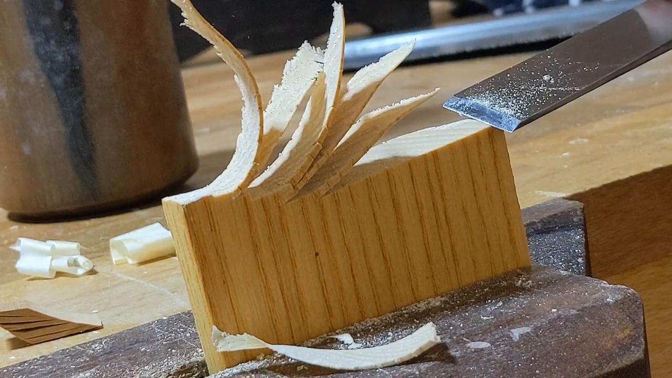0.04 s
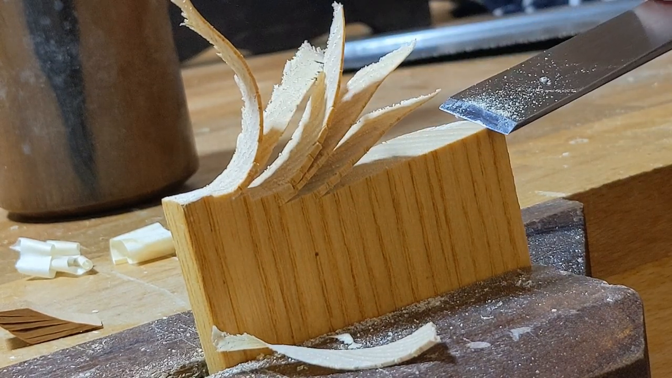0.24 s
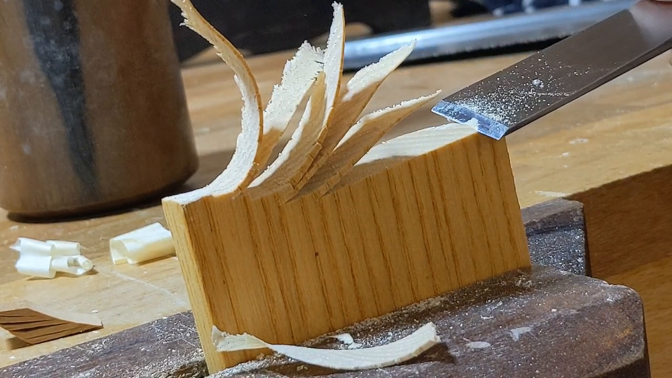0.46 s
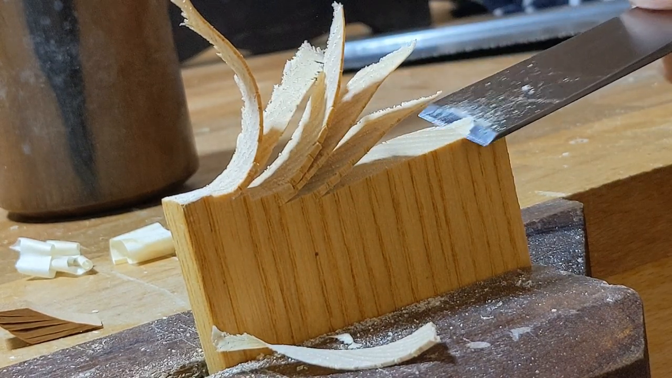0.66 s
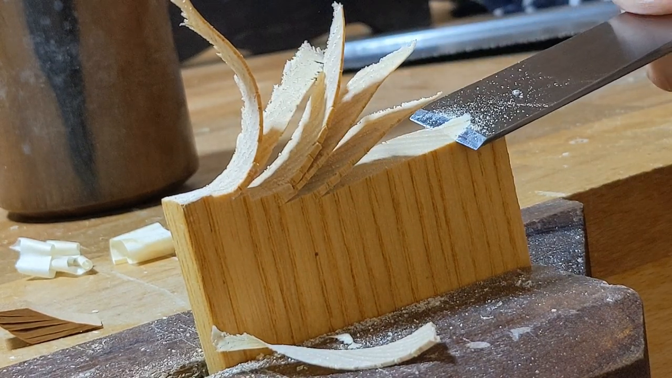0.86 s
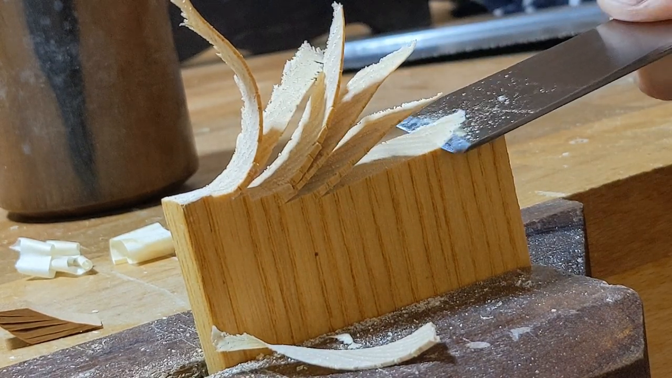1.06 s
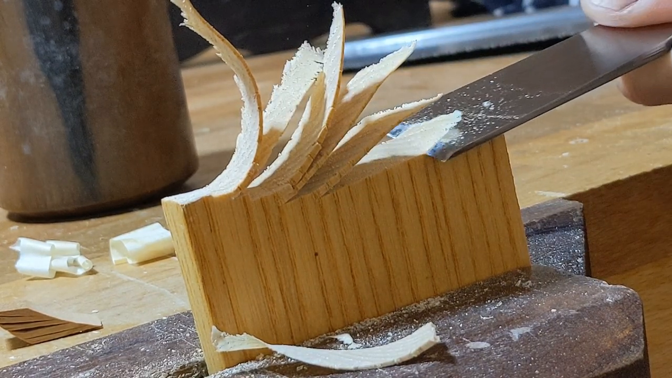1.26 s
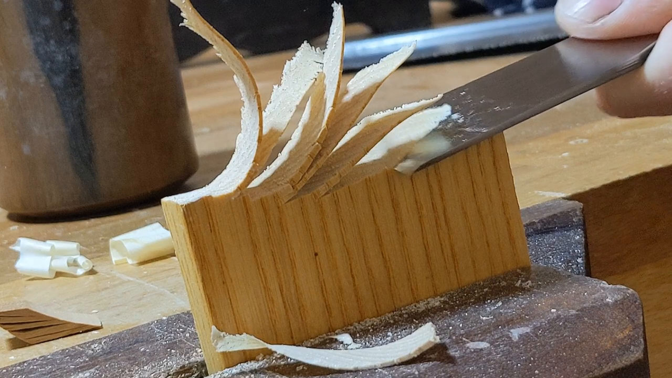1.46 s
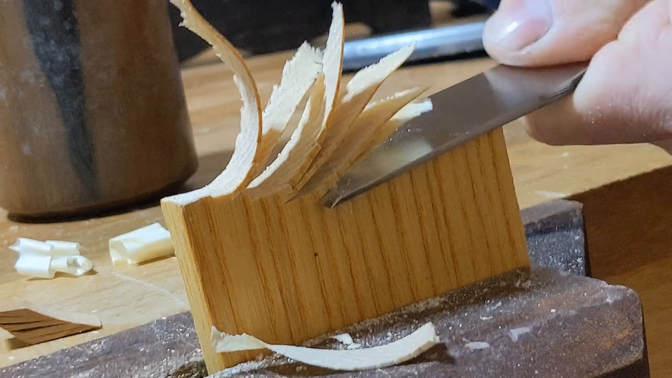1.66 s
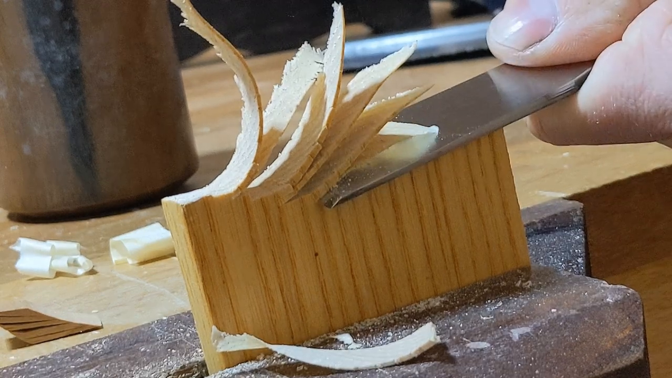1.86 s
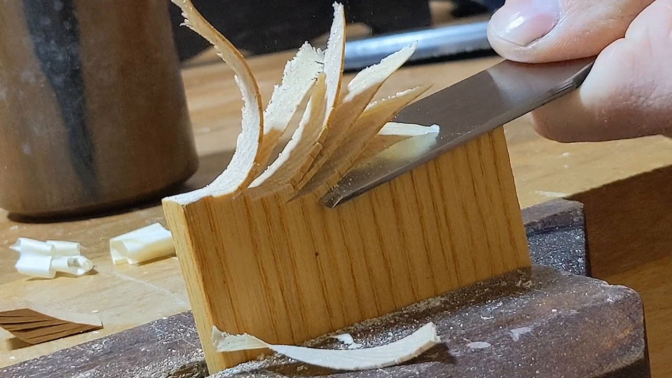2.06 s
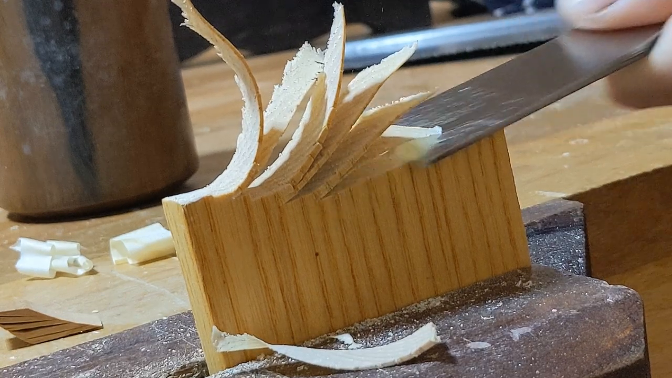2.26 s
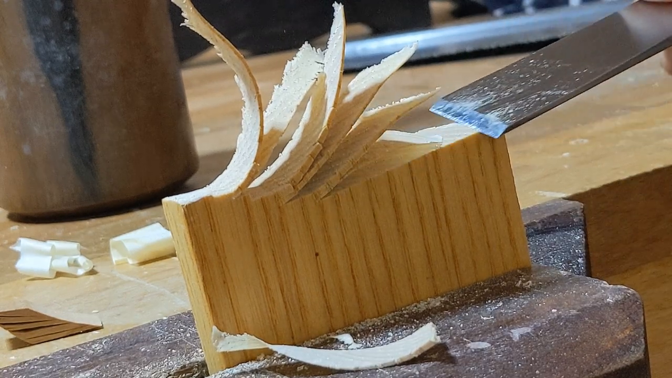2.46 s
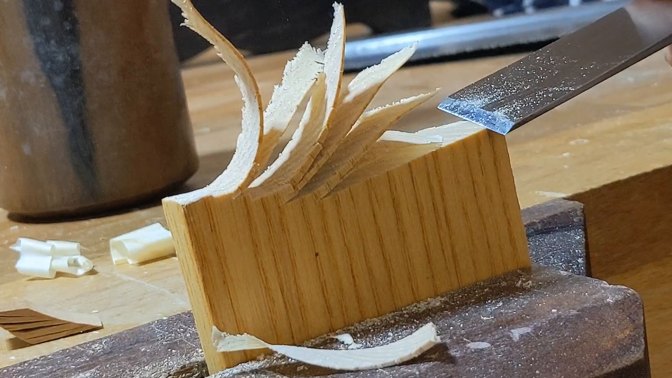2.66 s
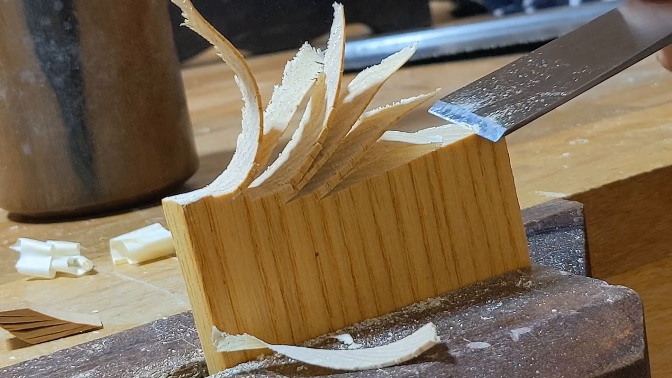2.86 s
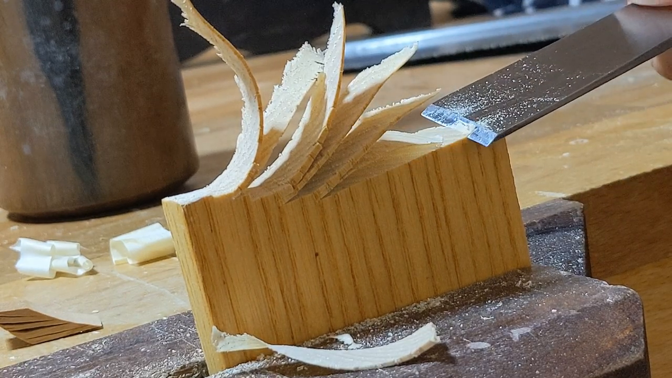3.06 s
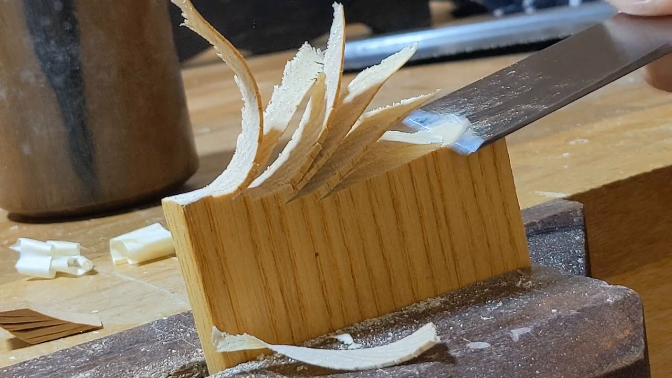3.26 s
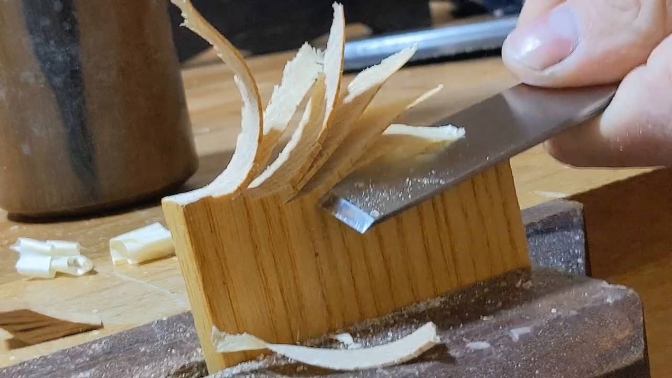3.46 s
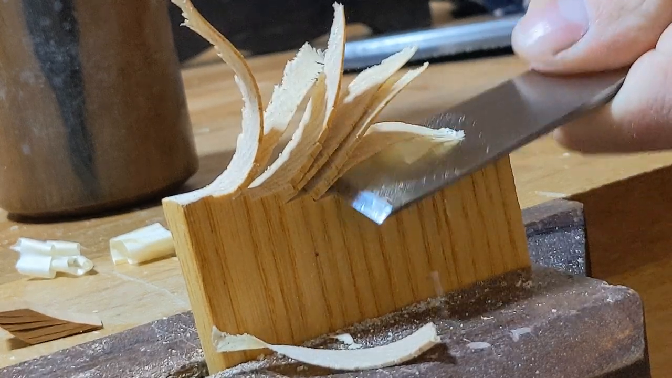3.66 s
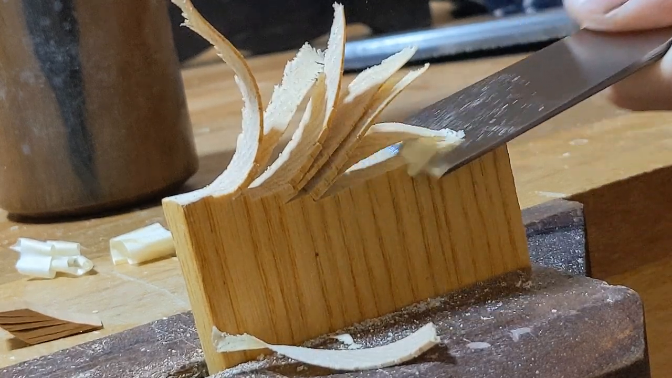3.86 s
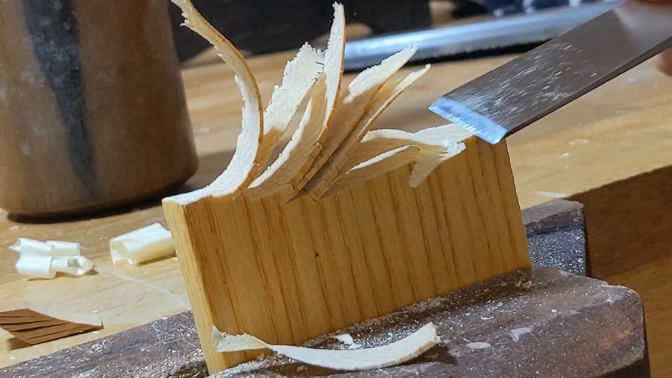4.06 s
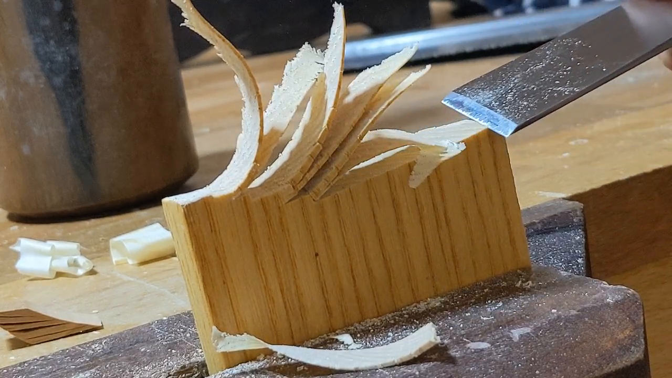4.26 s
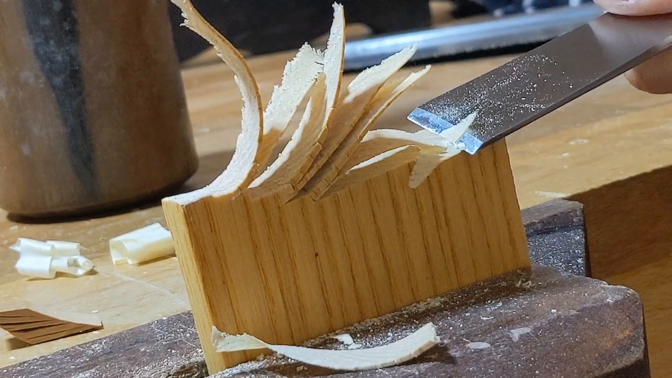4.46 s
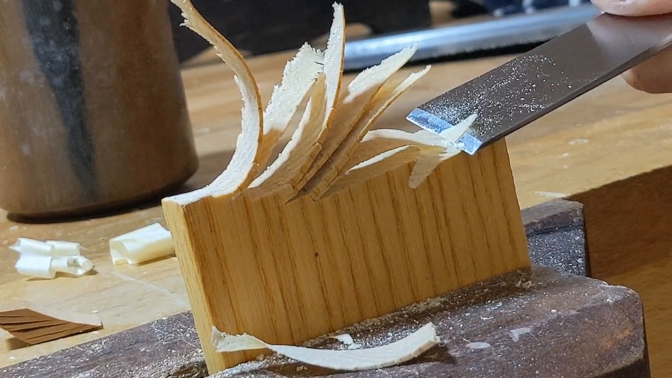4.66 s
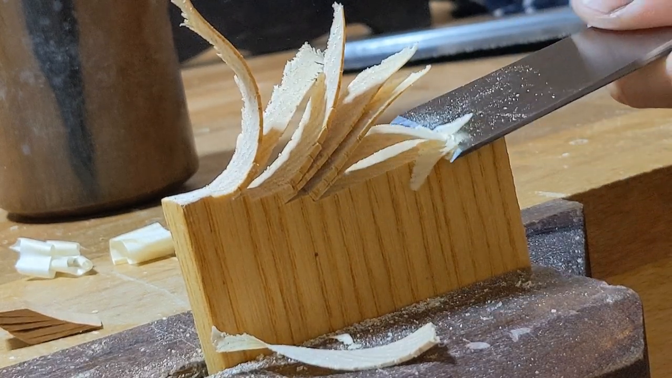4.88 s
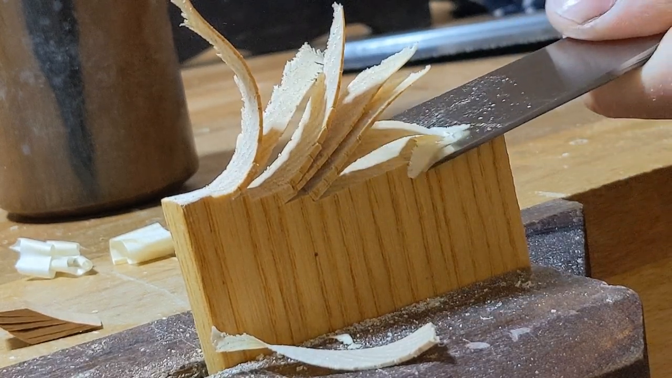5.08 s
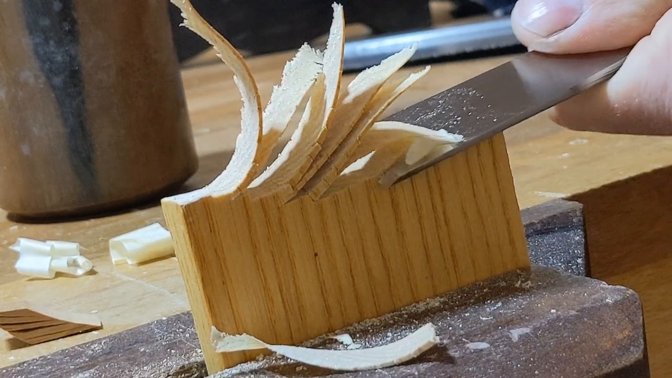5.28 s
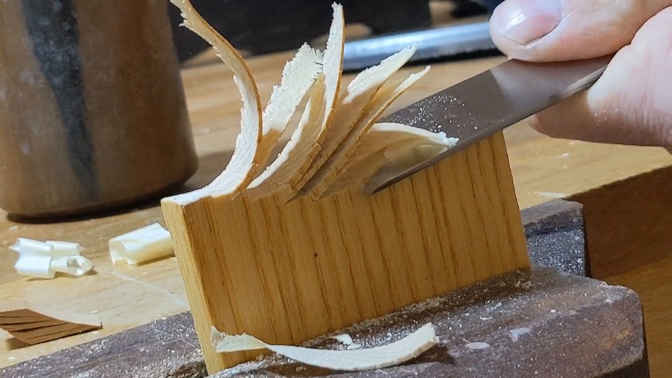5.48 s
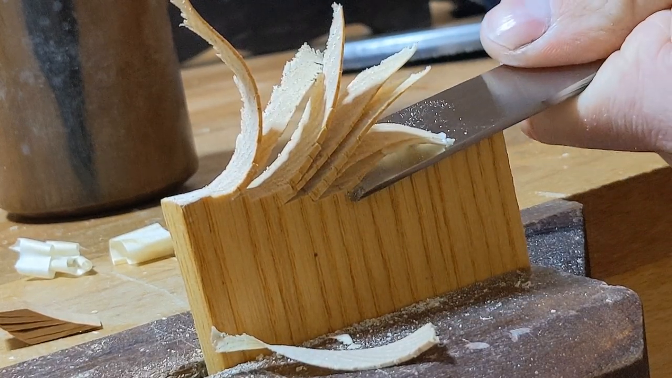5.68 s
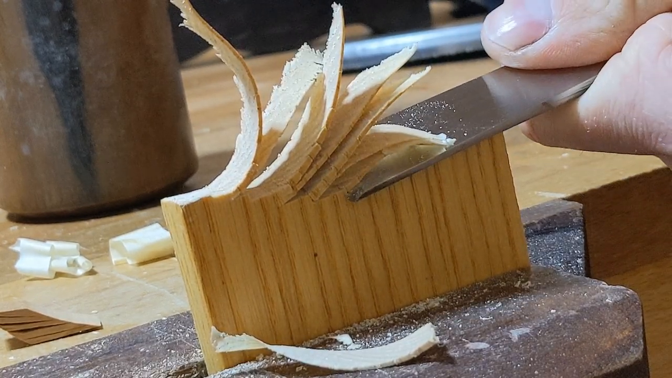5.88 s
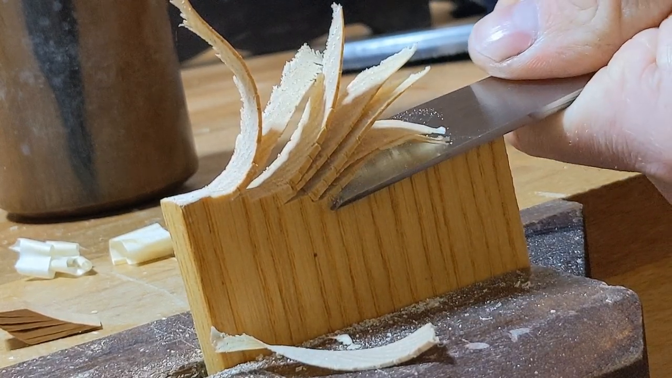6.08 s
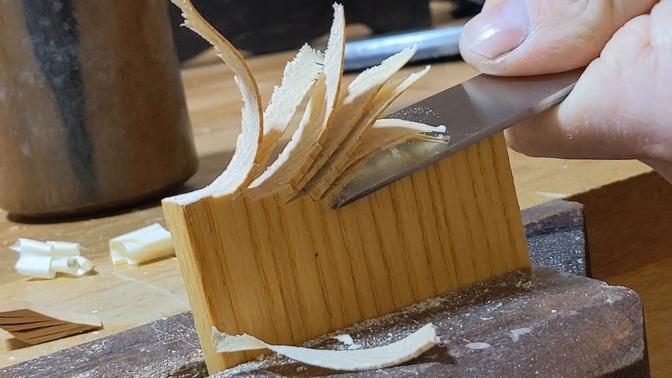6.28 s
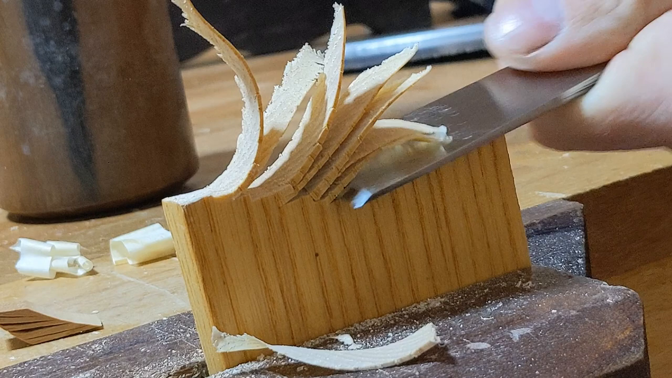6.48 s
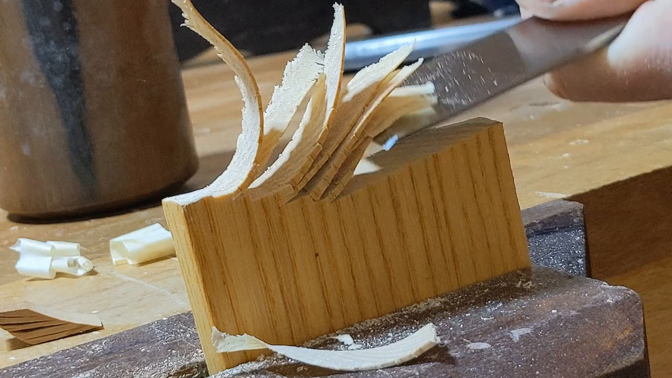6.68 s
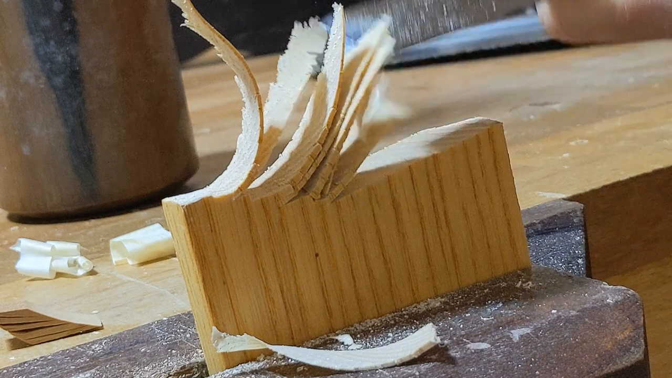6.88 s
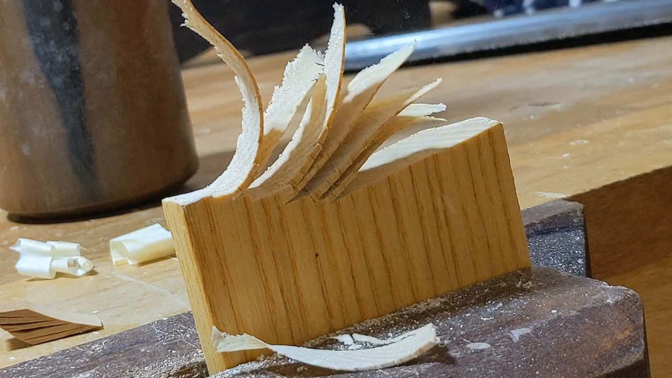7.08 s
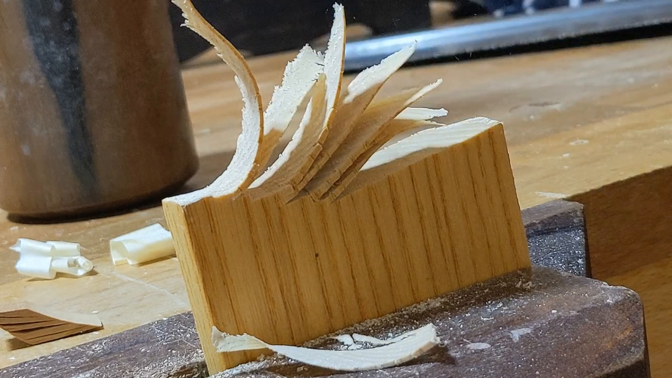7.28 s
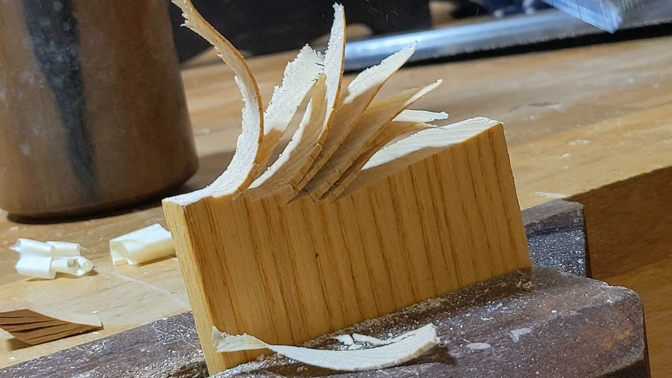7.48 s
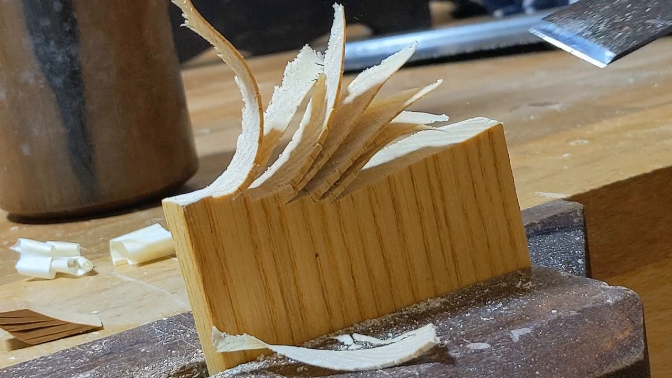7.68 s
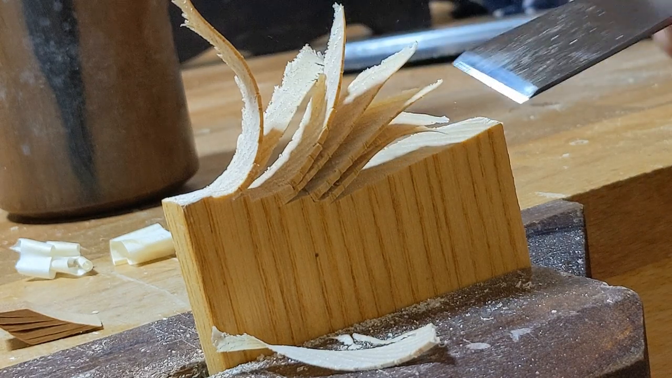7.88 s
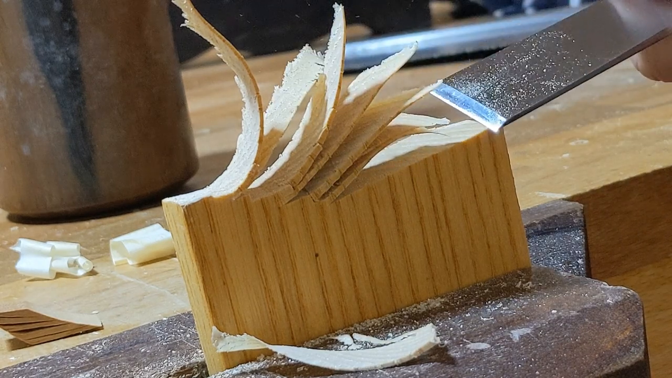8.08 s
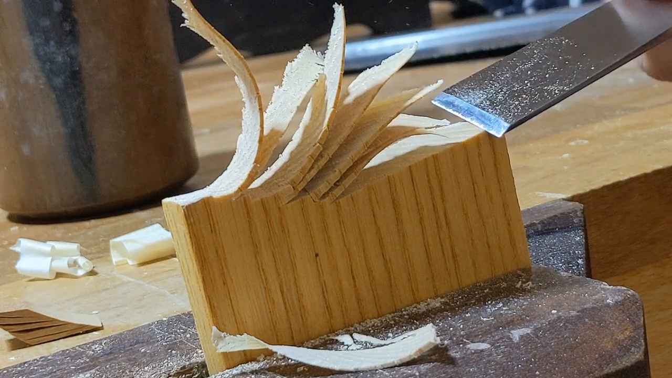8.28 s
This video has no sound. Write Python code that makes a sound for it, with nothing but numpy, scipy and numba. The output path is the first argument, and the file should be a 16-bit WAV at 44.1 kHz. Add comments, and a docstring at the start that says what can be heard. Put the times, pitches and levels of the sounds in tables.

```python
"""A small workshop: a hand-pushed chisel pares thin shavings from a wooden block clamped on a bench.
Dense random clicks make the tearing of fibres, moving noise resonances the rustle of blade and shavings;
block and bench rumble in low bands; snaps, knocks, bumps, a squeak and a skipping edge ring wood and blade.
A faint mains hum and room hiss lie under it, and short tails of random echoes give the room.
A close pair of microphone ports hears the work brighter on the right."""
import sys
import numpy as np
from scipy import signal
from scipy.fft import rfft, irfft, next_fast_len
from scipy.io import wavfile
from scipy.ndimage import uniform_filter1d
from numba import njit

SR = 44100
rng = np.random.default_rng(int(sys.argv[2]) if len(sys.argv) > 2 else 0)


def makeup_ratio(level_db):
    """Linear amplitude ratio for a level in decibels (20 dB per factor of ten)."""
    decades = np.asarray(level_db, float) / 20
    return 10 ** decades


def dump_mix(stems):
    """Bounce the given channels to the path in sys.argv[1] as a 16-bit WAV at rate SR."""
    frames = np.atleast_2d(stems).T  # one column per channel
    limited = np.clip(frames, -1, 1)  # hard clip at full scale
    pcm = np.round(limited * 32767).astype(np.int16)
    wavfile.write(sys.argv[1], SR, pcm)


N = 367787  # samples
TICKS = np.arange(0, N / SR + .01, .0005)  # times of the level curves, s
HZ = np.fft.rfftfreq(16384, 1 / SR)

# room hiss: f/Hz, relative power density/dB; then its rms level/dB
HISS = [(15, -57), (25, -19), (70, -11.5), (102, -21.5), (130, -19), (363, -22.5), (463, -21), (2550, -31),
        (3720, -29.5), (14400, -45.5), (15700, -54), (16000, -96)]
HISS_DB = -65.5
# likeness of the hiss at the two ports: f/Hz, left-right coherence
HISS_SAME = [(60, 0.18), (240, 0.38), (950, 0.043), (3770, -0.11), (15000, -0.041)]
HUM_HZ, HUM_DB = 100, -72.5

# modes of block and blade, shared by all contacts: f/Hz, width/Hz, height/dB before each sound's share
BODY = [(217.5, 10, 7), (410, 25, 9), (456, 30, 9), (570, 60, 5), (700, 30, 6), (1345, 60, 8),
        (2100, 300, 7), (4130, 450, 9), (5960, 370, 2)]
MODES_DB = sum(db / (1 + (2 * (HZ - hz) / width) ** 2) for hz, width, db in BODY)
MODE_WANDER = .015  # share by which the modes slide as the cut deepens and the grip shifts
MODE_SHARE, MODE_DAMPING = .8, .45  # the grip damps now one mode, now another

# dull bumps as the blade is levered and set down: t/s, length/s, level/dB, centre f/Hz
BUMPS = [(0.012, 0.031, -65, 194), (1.761, 0.015, -46, 116), (1.829, 0.071, -59.5, 158),
         (1.922, 0.018, -56, 83), (2.165, 0.012, -56, 234), (2.255, 0.018, -55.5, 124),
         (2.359, 0.076, -63, 685), (3.463, 0.032, -33, 307), (3.462, 0.033, -50, 89),
         (3.504, 0.015, -34, 94), (3.551, 0.013, -31.5, 565), (3.577, 0.035, -42, 94),
         (3.603, 0.014, -33, 450), (3.607, 0.0055, -37.5, 915), (3.644, 0.024, -43.5, 192),
         (3.698, 0.016, -40.5, 573), (4.572, 0.025, -45, 396), (6.199, 0.022, -41.5, 424),
         (5.984, 0.06, -50, 400), (6.323, 0.022, -56.5, 366), (6.473, 0.022, -46.5, 383),
         (6.469, 0.014, -52, 185), (6.522, 0.013, -53, 246), (6.558, 0.0071, -47.5, 190),
         (8.16, 0.026, -73, 295)]
BUMP_OCTAVES = 0.58
BUMP_BITE_DB_PER_S, BUMP_FALL_DB_PER_S = 5999, 462

# the blade knocks the block: t/s, crack peak level/dB, centre f/Hz, ring over crack/dB, crack width/octaves
TAPS = [(0.013, -34.5, 2330, 1.5, 0.37), (2.357, -42.5, 1660, 1.5, 0.27), (2.563, -51, 1690, 5.5, 0.27),
        (3.4644, -13.5, 2240, -3.5, 0.57), (3.688, -11, 2400, -10.5, 0.4), (8.1693, -28, 2930, 1, 0.23)]
# modes of the lifted blade and the free block: f/Hz, level/dB before scatter and pitch weighting, t60/s
LIFTED = [(343, 14, 0.08), (690, 14, 0.18), (1370, 3, 0.09), (1560, 8, 0.06), (1800, 10, 0.025),
          (2900, 6, 0.035), (3150, 9, 0.025), (4690, 5, .02), (5670, 13, 0.01), (6930, 10, 0.01)]
RING_FUZZ = 1.2  # radians of wobble: the hand-held blade does not ring cleanly
HIGH_CRACK_DB, HIGH_CRACK_OCTAVES = -9, 0.2  # every knock has a second, higher, narrow crack

# pushes of the edge and, near 7 s, brushes against shavings: t/s, length/s, tearing level/dB at the end,
# swell/dB on the way, block level/dB, bench level/dB at the end
CUTS = [(0.285, 0.24, -64, 5.5, -63.5, -87), (0.561, 0.14, -56.5, 9.5, -56.5, -68),
        (0.775, 0.043, -43.5, 10, -50, -55), (1.012, 0.039, -55, 11, -57, -73),
        (1.135, 0.05, -43.5, 9.5, -47, -60.5), (1.253, 0.27, -44.5, 11.5, -44.5, -58),
        (1.46, 0.13, -47.5, -6, -47, -58.5), (1.569, 0.13, -37.5, 7.5, -41, -60),
        (1.627, 0.075, -26, 14.5, -32, -44), (1.708, 0.0083, -49, -11, -51, -41.5),
        (1.746, 0.15, -70, -7, -65.5, -71), (2.856, 0.047, -58.5, 8, -61, -91),
        (2.966, 0.047, -50.5, 10, -56, -59.5), (3.138, 0.14, -49.5, 14.5, -52, -63),
        (3.383, 0.035, -36.5, 12, -37.5, -53), (3.451, 0.1, -74, -20, -64, -58),
        (3.673, 0.032, -64.5, -35.5, -52.5, -68), (4.335, 0.23, -46, 26.5, -69, -56),
        (4.795, 0.044, -55, 6.5, -58, -90), (4.844, 0.03, -56.5, -1, -58.5, -88),
        (4.935, 0.034, -40.5, 7.5, -45.5, -55), (5.041, 0.045, -37, 11.5, -40, -56),
        (5.201, 0.08, -38.5, 16, -40.5, -52.5), (5.32, 0.07, -38.5, 13.5, -39, -58),
        (5.447, 0.069, -44, 3.5, -46.5, -57), (5.521, 0.026, -36.5, 17, -35.5, -51),
        (5.644, 0.088, -42, 5, -42, -57), (6.07, 0.063, -46, 2.5, -50, -64),
        (6.138, 0.033, -30, 14, -35.5, -48.5), (6.876, 0.13, -57.5, 8, -81, -82),
        (7.065, 0.02, -59, -11, -91, -90)]
# colours of torn fibres, pushed block and bench: f/Hz, relative power density/dB
TEAR = [(500, -20), (1000, -13), (2500, -6.5), (4000, -10), (6500, -6), (8800, -15), (12000, -19),
        (15700, -24), (16000, -105)]
PUSH = [(60, -35.5), (150, -10), (300, -5), (500, -1.5), (800, -6.5), (1300, -4.5), (2200, -16),
        (4000, -63)]
BENCH = [(30, -71), (43, -43), (58, -11), (80, -3), (170, -12), (260, -23.5), (500, -60)]
BITE_DB_PER_S, TEAR_FALL_DB_PER_S = 1523, 301  # a contact starts fast and dies away at a steady rate
BUNDLES_PER_S, BUNDLE_DB, BUNDLE_S = 130, 7, .001  # whole bundles of fibres give way at once
BLOCK_LAG_S, BLOCK_FALL_DB_PER_S = 0.014, 310  # the block answers a push late
BENCH_LAG_S, BENCH_SWELL, BENCH_FALL_DB_PER_S = 0.013, 1.58, 184  # swell: multiple of the cut's

# short sharp cracks: fibres snapping, grit, a soft first skip of the edge:
# t/s, peak level/dB, centre f/Hz, width/octaves
SNAPS = [(1.568, -24, 2580, 0.89), (3.555, -28, 1100, 0.98), (3.6643, -40, 3300, 0.51),
         (3.768, -40, 2480, 0.6), (4.135, -46, 2470, 0.48), (4.362, -41, 3530, 0.14),
         (5.059, -23, 5100, 0.64), (5.268, -33, 5000, 1.4), (5.283, -45, 5870, 0.89),
         (5.291, -25, 6450, 0.11), (5.2994, -23, 6540, 0.21), (5.3753, -20.5, 2540, 0.58),
         (5.403, -40, 7000, 0.5), (5.424, -27, 7000, 0.69), (5.4644, -35, 3500, 1.1),
         (5.474, -42, 9000, 0.6), (5.531, -25.5, 5000, 1.1), (5.551, -41, 4000, 0.61),
         (5.57, -17.5, 4100, 0.51), (5.652, -30, 3760, 0.91), (5.694, -40, 4000, 0.98),
         (5.709, -27, 3000, 1.6), (5.719, -18, 3530, 1.04), (5.752, -36, 9000, 0.6),
         (5.758, -22.5, 4000, 1.3), (5.861, -50, 9000, 1.05), (5.928, -46.5, 2040, 0.6),
         (5.992, -39, 2470, 0.98), (6.089, -50, 7000, 0.69), (6.123, -28.5, 7000, 0.39),
         (6.1537, -24, 7000, 0.64), (6.164, -13, 5470, 1.2), (6.173, -20, 4970, 0.67),
         (6.1833, -19, 6150, 0.6), (6.251, -43, 8900, 0.61), (6.3222, -36.5, 1470, 0.5),
         (6.585, -53, 2200, 0.25), (6.614, -53, 1380, 0.27), (6.93, -44.5, 2070, 0.18),
         (7.011, -36, 2120, 0.22), (7.083, -41, 1810, 0.15), (7.1027, -40, 1960, 0.21)]

# blade levered out, drawn back, shavings brushed aside: t/s, length/s, level/dB at the end, swell/dB,
# centre f/Hz, half width/Hz of each of two poles
RUBS = [(2.242, 0.12, -57.5, -1, 1520, 1100), (2.378, 0.21, -66.5, -1, 2250, 930),
        (3.45, 0.071, -47, 2, 920, 500), (3.539, 0.018, -36.5, -11, 1020, 604),
        (3.59, 0.0096, -40, 1, 990, 497), (3.71, 0.15, -70.5, -16, 2280, 1240),
        (3.884, 0.21, -61, 3.5, 2550, 710), (4.116, 0.13, -70, -13.5, 2730, 900),
        (4.325, 0.16, -59.5, 3, 3460, 450), (4.427, 0.14, -47.5, 16, 3800, 483),
        (6.479, 0.08, -59, 3, 1080, 150), (6.554, 0.06, -55.5, 6.5, 1670, 700),
        (6.637, 0.2, -69.5, -6.5, 1470, 800), (6.859, 0.074, -62, 4.5, 2230, 390),
        (6.939, 0.081, -59, 9, 2180, 320), (7.025, 0.029, -66, 5, 2200, 300),
        (7.077, 0.028, -63.5, -3, 2090, 330)]
RUB_FALL_DB_PER_S = 417
RUB_BLOCK_DB, RUB_TEAR_DB = -3.5, -18  # a rub also shakes the block and scratches a few fibres

# steel squeaks on wood: t/s, length/s, level/dB at the end, swell/dB
SQUEAK = [(3.541, .012, -60, 0), (3.58, .013, -55, 0), (3.6, .018, -58, 0), (3.633, .008, -64, 0)]
SQUEAK_HZ = 5180

# the edge skips: first t/s, skips per s, unevenness as a share of the gap,
# first level/dB before the 3 dB gain in chatter(), level change/dB a skip
CHATTER = (5.9953, 280, .06, -22, -1.6)
SKIPS = 9

# port response: f/Hz, left minus right level/dB
PORT_DB = [(60, 0), (180, 2), (550, 0), (1650, 0.3), (4970, -5.5), (15000, -15)]
# likeness of the cut at the two ports: f/Hz, share that both hear alike
PORT_SAME = [(300, 0.92), (1200, 0.52), (4000, 0.022), (12000, 0.053)]
LEAD_S = .00008  # the left port hears first
# decay of the room: f/Hz, t60/s
ROOM = [(150, 0.36), (600, 0.32), (2500, 0.21), (7000, 0.18), (14000, 0.047)]
LOW_END_HZ, TOP_END_HZ = 48, 16200


def evened(x):
    """Scales to rms 1."""
    return x / np.sqrt(np.mean(x ** 2) + 1e-20)


def smoothed_twice(x, size):
    """Two running means, for a slow curve without corners."""
    return uniform_filter1d(uniform_filter1d(x, size), size)


def read(points, hz):
    """Reads a spectrum table on a log-frequency axis."""
    f, value = np.transpose(points)
    return np.interp(np.log(hz + 1), np.log(f + 1), value)


def causal(db):
    """The shortest causal response (minimum phase) with the given gain in dB from 0 Hz to half the rate."""
    log_gain = np.log(makeup_ratio(np.maximum(db, -100)))
    circle = np.concatenate([log_gain, log_gain[-2:0:-1]])
    return np.fft.ifft(np.exp(np.conj(signal.hilbert(circle)))).real[:4096]


def band_db(centre_hz, octaves):
    """A rounded hump on a log-frequency axis, 3 dB down at the given octaves from its centre."""
    return -3 * (np.log2((HZ + 1) / centre_hz) / octaves) ** 2


def grains(per_s, spread_db, clump_db, clump_s):
    """Random clicks of uneven size, bunched in clumps, rms 1."""
    size = makeup_ratio(spread_db * np.minimum(rng.exponential(1, N), 3)) * rng.standard_normal(N)
    clumps = evened(uniform_filter1d(rng.standard_normal(N), max(2, round(clump_s * SR))))
    struck = rng.random(N) < per_s / SR
    return evened(size * struck * makeup_ratio(clump_db * clumps))


def click(centre_hz, octaves, ring, wood=0):
    """One sharp break ringing through the body, peak 1; ring and wood are shares of modes and tear colour."""
    sound = causal(band_db(centre_hz, octaves) + ring * MODES_DB + wood * read(TEAR, HZ))
    return sound / abs(sound).max()


def contacts(start, length, end_db, swell_db, fall_db_per_s, bite_db_per_s=BITE_DB_PER_S):
    """Level in dB of each contact: a fast bite, a steady swell to its end, a steady fall."""
    start, length, end_db, swell_db = (np.reshape(c, (-1, 1)) for c in (start, length, end_db, swell_db))
    t = TICKS - start
    swelling = end_db - swell_db * (1 - np.clip(t / length, 0, 1))
    held = swelling - fall_db_per_s * np.maximum(t - length, 0)
    return np.maximum(np.minimum(held, -70 + bite_db_per_s * t), -150)


def rub_levels():
    """Level in dB of each rub, shared by rustle, fibres and block."""
    return contacts(*np.transpose(RUBS)[:4], RUB_FALL_DB_PER_S)


def played(*levels_db):
    """The summed power of contacts as a gain, sample by sample."""
    power = sum((makeup_ratio(db) ** 2).sum(0) for db in levels_db)
    return np.interp(np.arange(N) / SR, TICKS, np.sqrt(power))


def through_body(clicks, db):
    """Clicks coloured by a response in dB, rms 1."""
    return evened(signal.oaconvolve(clicks, causal(db))[:N])


def patches(shape, bins, frames):
    """Random patches over frequency and time, rms 1."""
    across = uniform_filter1d(rng.standard_normal(shape), size=bins, axis=0)
    return evened(uniform_filter1d(across, size=frames, axis=1))


def drifting(x, size, depth_db):
    """The modes slide and the colour shifts in random patches as the contact moves; rms 1."""
    z = signal.stft(x, nperseg=size)[2]
    drift = patches(z.shape, 6, 6400 // size)
    slide = evened(smoothed_twice(rng.standard_normal(z.shape[1]), 8192 // size))
    hz = np.fft.rfftfreq(size, 1 / SR)[:, None]
    coarse_modes_db = uniform_filter1d(MODES_DB, size=16384 // size)
    modes_db = np.interp(hz * (1 + MODE_WANDER * slide), HZ, coarse_modes_db)
    grip = patches(z.shape, size // 40, 8192 // size)
    modes_db *= np.clip(MODE_SHARE + MODE_DAMPING * grip, 0, 1.3)
    return evened(signal.istft(z * makeup_ratio(depth_db * drift + modes_db), nperseg=size)[1][:N])


@njit
def smooth(x, keep):
    """A one-pole low-pass whose memory changes sample by sample, at constant noise power."""
    out, state = np.empty_like(x), 0j
    for i in range(len(x)):
        state = keep[i] * state + np.sqrt(1 - keep[i] ** 2) * x[i]
        out[i] = state
    return out


def background():
    """Room hiss is smooth shaped noise, partly alike at both ports; mains hum is a wavering sine."""
    frames, hz = N // 512 + 5, np.fft.rfftfreq(2048, 1 / SR)
    a, b, c, d = rng.standard_normal((frames, 1025, 4)).T
    same = np.clip(read(HISS_SAME, hz), -1, 1)[:, None]
    left = a + 1j * b
    right = same * left + np.sqrt(1 - same ** 2) * (c + 1j * d)
    z = np.array([left, right]) * makeup_ratio(read(HISS, hz))[:, None]
    z *= makeup_ratio(3 / (1 + ((hz - 3750) / 200) ** 2))[:, None]  # a faint fan whistle
    hiss = evened(signal.istft(z, nperseg=2048, noverlap=1536)[1][:, :N])
    phase_waver, level_waver = [evened(smoothed_twice(w, 3000)) for w in rng.standard_normal((2, N))]
    hum = np.sqrt(2) * np.sin(2 * np.pi * HUM_HZ * np.arange(N) / SR + 0.29 * phase_waver)
    return makeup_ratio(HISS_DB) * hiss + hum * makeup_ratio(HUM_DB + 1.7 * level_waver)


def bumps():
    """Each bump is a short shudder in a low band of block or bench."""
    s, length, db, hz = np.transpose(BUMPS)
    levels_db = contacts(s, length, db, 0.35, BUMP_FALL_DB_PER_S, BUMP_BITE_DB_PER_S)
    shudders = rng.standard_normal((len(BUMPS), 8192))
    out = np.zeros(N + SR)
    for first, level_db, centre_hz, shudder in zip(s, levels_db, hz, shudders):
        colour = causal(band_db(centre_hz, BUMP_OCTAVES) + 0.3 * MODES_DB)
        gain = np.interp(first + np.arange(8192) / SR, TICKS, makeup_ratio(level_db))
        bump = signal.oaconvolve(gain * shudder, colour / np.linalg.norm(colour))
        out[round(first * SR):][:12287] += bump
    return out[:N]


def taps():
    """A knock is a short crack that rings the modes near its pitch most."""
    out, t = np.zeros(N + SR), np.arange(4096) / SR
    chances = rng.standard_normal((len(TAPS), len(LIFTED), 4096))
    for (s, db, hz, ring_db, octaves), chance in zip(TAPS, chances):
        ring = 0
        for (f, level_db, t60), c in zip(LIFTED, chance):
            mode_db = level_db + 2 * c[0] - 60 * t / t60 - 4.35 * np.log2(f / hz) ** 2
            wobble = RING_FUZZ * np.minimum(t / 0.0022, 1) * evened(uniform_filter1d(c, size=90))
            ring = ring + makeup_ratio(mode_db) * np.sin(2 * np.pi * f * t + wobble)
        ring = np.minimum(t / 0.00067, 1) * ring / abs(ring).max()
        crack = click(hz, octaves, 0.11)
        high_crack = click(1.85 * hz, HIGH_CRACK_OCTAVES, 0.065)
        knock = crack + makeup_ratio(HIGH_CRACK_DB) * high_crack + makeup_ratio(ring_db) * ring
        out[round(s * SR):][:4096] += makeup_ratio(db) * knock
    return out[:N]


def cutting():
    """Dense bright fibre breaks over a duller layer of the same and further breaks.

    Force and colour drift as the blade meets other grain."""
    tear_gain = played(contacts(*np.transpose(CUTS)[:4], TEAR_FALL_DB_PER_S), rub_levels() + RUB_TEAR_DB)
    fibres = grains(9000, 1.6, 0.98, 0.0092)
    bright = through_body(fibres, read(TEAR, HZ))
    dull = through_body(fibres + grains(4400, 0.5, 0.74, 0.053), band_db(2490, 0.62))
    surges = evened(smoothed_twice(rng.standard_normal(N), 500))
    bundles = (rng.random(N) < BUNDLES_PER_S / SR) * rng.random(N)
    bundles = signal.lfilter([1], [1, -np.exp(-1 / (BUNDLE_S * SR))], bundles)
    force = tear_gain * makeup_ratio(1.3 * surges) * (1 + makeup_ratio(BUNDLE_DB) * bundles)
    return force * drifting(makeup_ratio(4.0) * bright + makeup_ratio(-2.5) * dull, size=512, depth_db=2.2)


def pushing():
    """The shove of the hand shakes the block and, lower down, the bench."""
    start, length, _, swell_db, block_db, bench_db = np.transpose(CUTS)
    block_levels = contacts(start, length + BLOCK_LAG_S, block_db, swell_db, BLOCK_FALL_DB_PER_S)
    bench_levels = contacts(start, length + BENCH_LAG_S, bench_db, BENCH_SWELL * swell_db, BENCH_FALL_DB_PER_S)
    block = through_body(grains(3000, 1.9, 2.2, 0.011), read(PUSH, HZ))
    bench = through_body(grains(2000, 4.3, 0.59, 0.032), read(BENCH, HZ) + MODES_DB)
    block_gain = played(block_levels, rub_levels() + RUB_BLOCK_DB)
    return block_gain * drifting(block, size=2048, depth_db=3.5) + played(bench_levels) * bench


def snaps():
    """Each short sharp crack has a brief spray of after-cracks."""
    out, t = np.zeros(N + SR), np.arange(4096) / SR
    sprays = rng.standard_normal((len(SNAPS), 4096))
    for (s, db, hz, octaves), spray in zip(SNAPS, sprays):
        hit = spray * makeup_ratio(-12 - 60 * t / 0.008)
        hit[0] = 1
        crack = signal.oaconvolve(hit, click(hz, octaves, 0.23, wood=0.88))[:4096]
        out[round(s * SR):][:4096] += makeup_ratio(db) * crack / abs(crack).max()
    return out[:N]


def rubbing():
    """A soft scuff or rustle in a resonance that moves and widens with the contact."""
    rub_db = rub_levels()
    loudest = np.array(RUBS)[rub_db.argmax(0)]
    rub_hz, width_hz = (np.interp(np.arange(N) / SR, TICKS, uniform_filter1d(c, size=60))
                        for c in loudest[:, 4:].T)
    turn = np.exp(2j * np.pi * np.cumsum(rub_hz) / SR)
    keep = np.exp(-2 * np.pi * width_hz / SR)
    rustle = grains(8000, 1.8, 1.8, .008)
    # shift the centre to 0 Hz, low-pass twice, shift back
    narrowed = smooth(smooth(rustle / turn, keep), keep)
    rub = (turn * narrowed * np.sqrt((1 - keep ** 2) / (1 + keep ** 2))).real
    return played(rub_db) * through_body(rub, 0.081 * MODES_DB)


def squeak():
    """A thin, slightly fuzzy whistle: a sine with a random phase wobble."""
    t = np.arange(N) / SR
    wobble = evened(uniform_filter1d(rng.standard_normal(N), 300))
    gain = played(contacts(*np.transpose(SQUEAK), 900, BUMP_BITE_DB_PER_S))
    return gain * np.sqrt(2) * np.sin(2 * np.pi * SQUEAK_HZ * t + 0.78 * wobble)


def chatter():
    """The edge sticks and skips a few times at a nearly steady rate."""
    first_s, per_s, uneven, db, step_db = CHATTER
    k, skips = np.arange(SKIPS), np.zeros(N)
    at = first_s + (k + uneven * rng.standard_normal(SKIPS)) / per_s
    skips[np.round(at * SR).astype(int)] = makeup_ratio(db + step_db * k)
    return makeup_ratio(3.0) * signal.oaconvolve(skips, click(2100, 0.63, 0.23))[:N]


def ports(x, aside, breaks):
    """The left port leads a little, is shaded in the treble and faces other fibres of the wide cut."""
    size = next_fast_len(N + 2048)
    hz = np.fft.rfftfreq(size, 1 / SR)
    # half of the level and time difference goes to each port
    half = makeup_ratio(read(PORT_DB, hz) / 2) * np.exp(1j * np.pi * hz * LEAD_S)
    same = np.clip(read(PORT_SAME, hz), 0, 1)
    left = same * rfft(x, size) + np.sqrt(1 - same ** 2) * rfft(aside, size) + rfft(breaks, size)
    right = rfft(x + breaks, size)
    return irfft(np.array([left * half, right / half]), size)[:, :N]


def room(x):
    """Sparse echoes of random sign, each band dying at its own speed, other echoes for each port."""
    echoes = np.zeros((2, SR // 2))
    at = np.arange(100, SR // 2 - 20, 20) + rng.integers(0, 20, (2, (SR // 2 - 101) // 20))
    np.put_along_axis(echoes, at, rng.choice([-1., 1.], at.shape), 1)
    hz, t, z = signal.stft(echoes, SR, nperseg=256)
    same = np.clip(1 - hz / 1500, 0, 1)[:, None]  # long waves reach both ports alike
    z[1] = same * z[0] + np.sqrt(1 - same ** 2) * z[1]
    z[0] *= makeup_ratio(0.1 * read(PORT_DB, hz))[:, None]
    decay = makeup_ratio(-60 * t / read(ROOM, hz)[:, None])
    tail = signal.istft(z * decay, SR, nperseg=256)[1]
    return signal.fftconvolve(x[None], tail / np.linalg.norm(tail[1]), axes=1)[:, :N]


def scene():
    """The work, direct and through the room, over the background."""
    breaks = bumps() + taps() + snaps() + squeak() + chatter()
    work, aside = (cutting() + pushing() + rubbing() for side in "ab")
    direct = ports(work, aside, breaks)
    reflected = makeup_ratio(-7.5) * room(work + makeup_ratio(-2.5) * breaks)
    return background() + direct + reflected


def roll_off(x):
    """The treble ends steeply here."""
    return signal.sosfilt(signal.butter(12, 16660, fs=SR, output="sos"), x)


def record(dry):
    """Rumble is thinned below about 50 Hz; the band ends near 16 kHz."""
    low_cut = signal.butter(2, LOW_END_HZ, "high", fs=SR, output="sos")
    heard = signal.sosfilt(low_cut, dry)
    heard = signal.oaconvolve(heard, signal.firwin(255, TOP_END_HZ, fs=SR)[None], "same")
    return roll_off(heard)


dry = scene()
out = record(dry)
dump_mix(out)
```